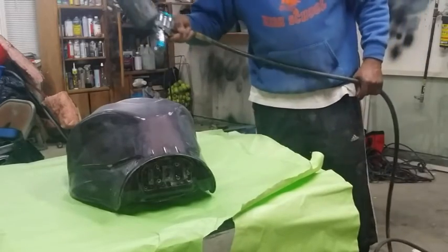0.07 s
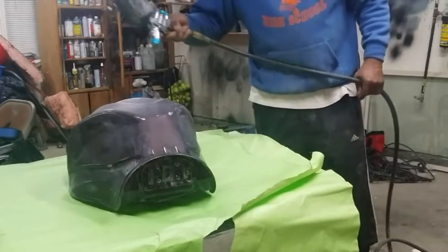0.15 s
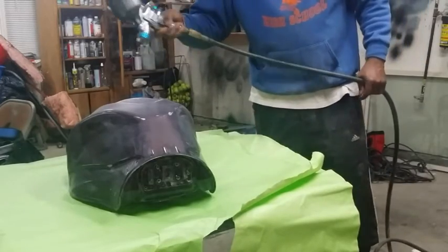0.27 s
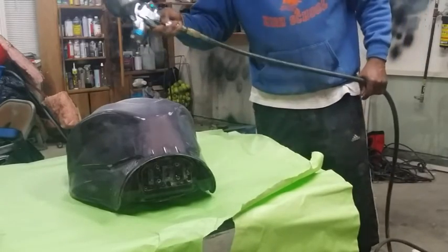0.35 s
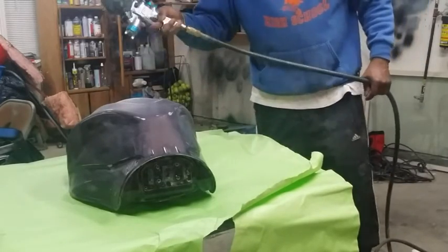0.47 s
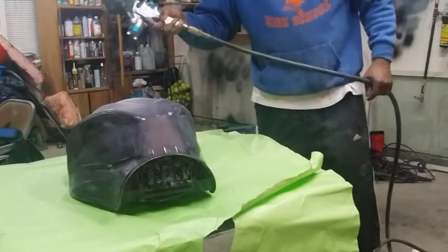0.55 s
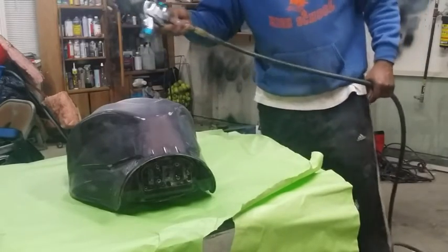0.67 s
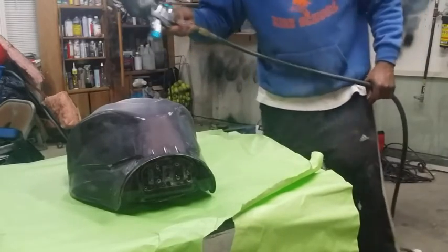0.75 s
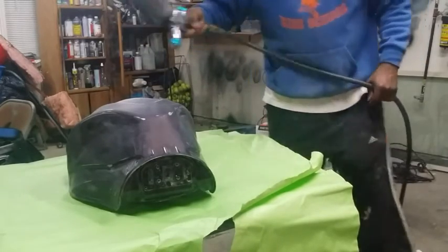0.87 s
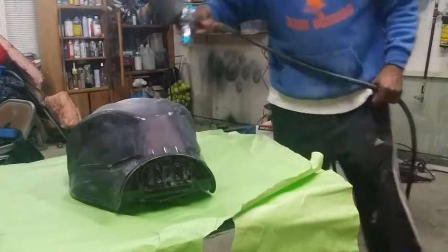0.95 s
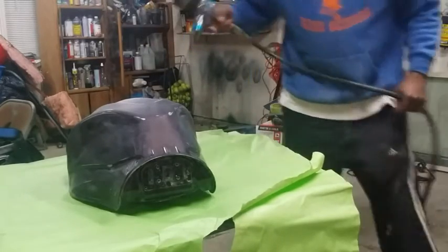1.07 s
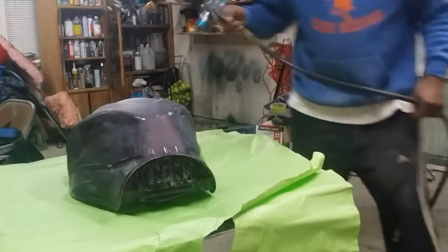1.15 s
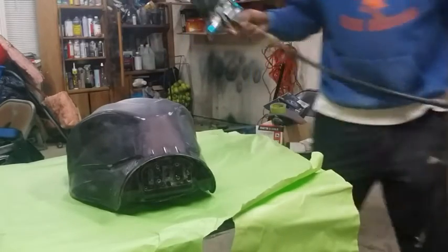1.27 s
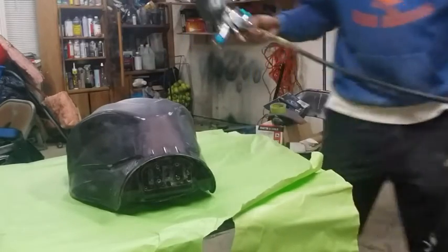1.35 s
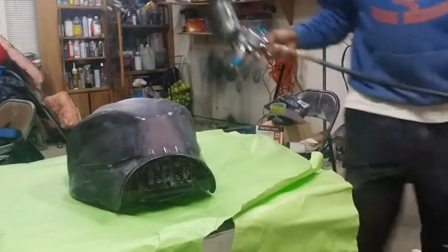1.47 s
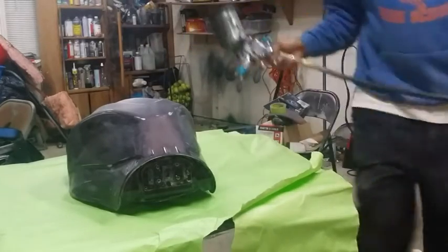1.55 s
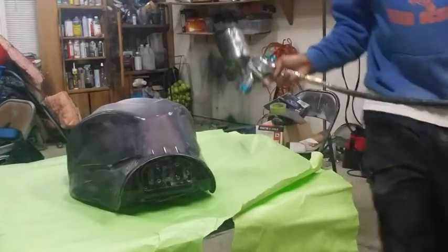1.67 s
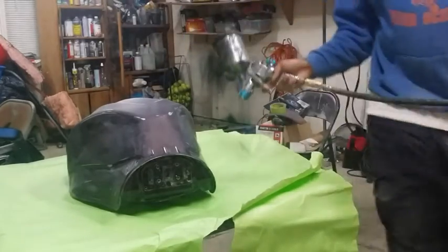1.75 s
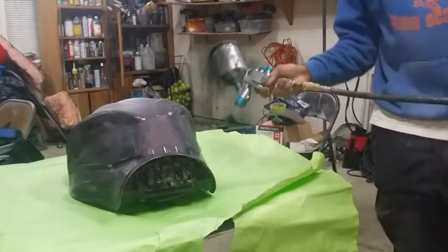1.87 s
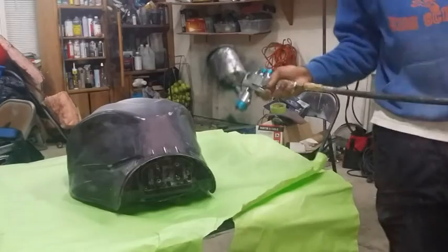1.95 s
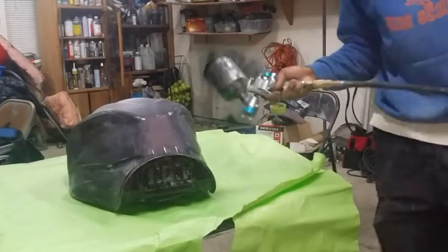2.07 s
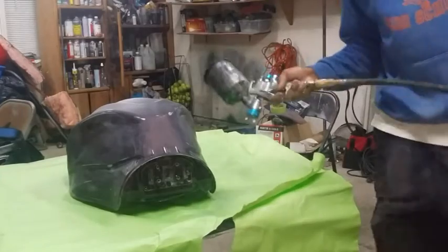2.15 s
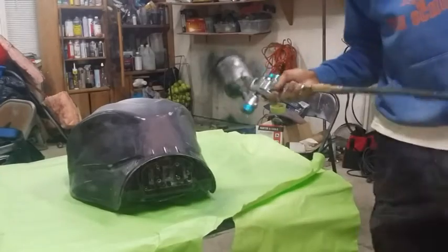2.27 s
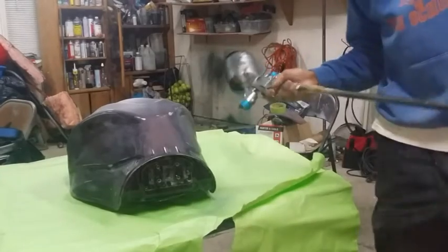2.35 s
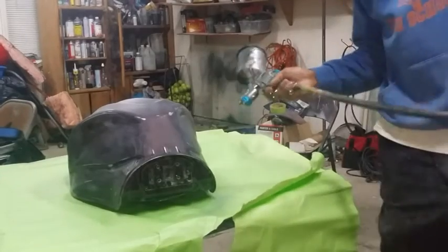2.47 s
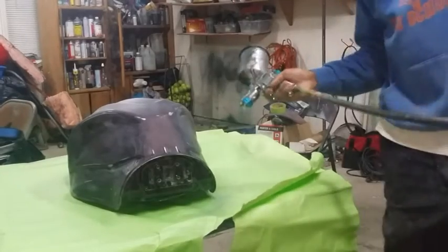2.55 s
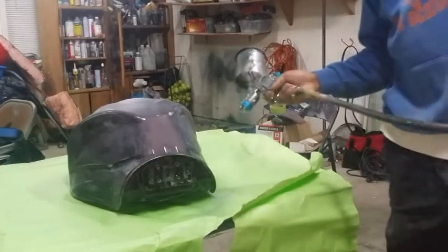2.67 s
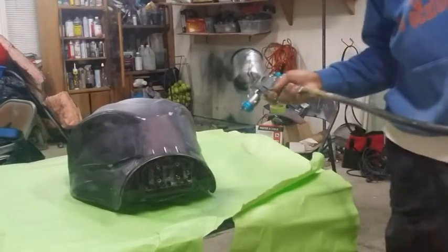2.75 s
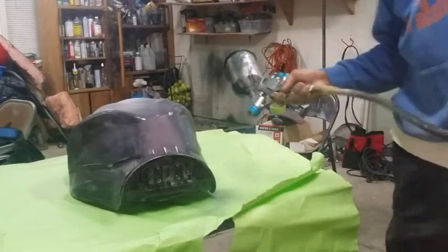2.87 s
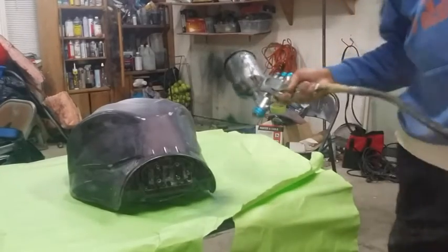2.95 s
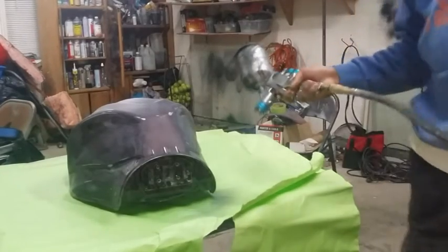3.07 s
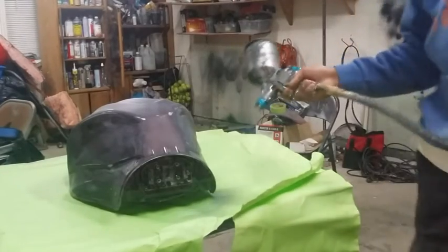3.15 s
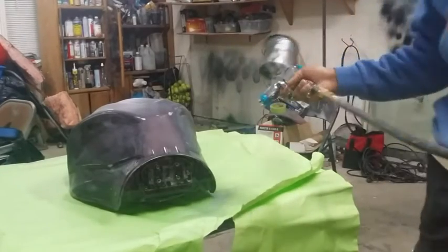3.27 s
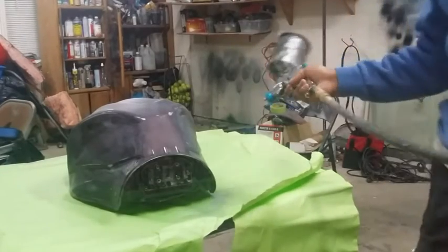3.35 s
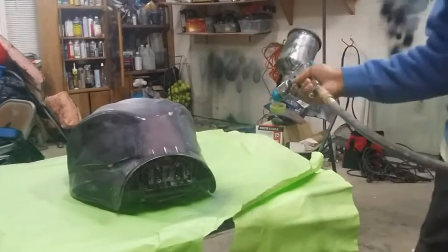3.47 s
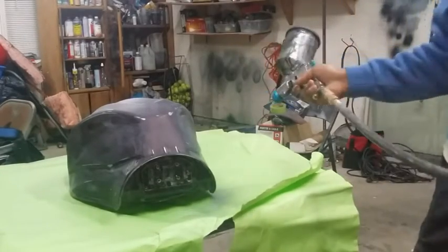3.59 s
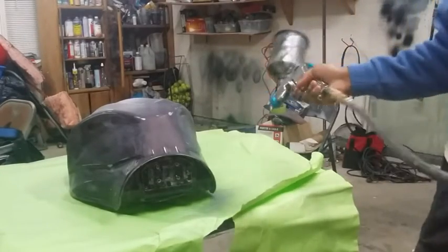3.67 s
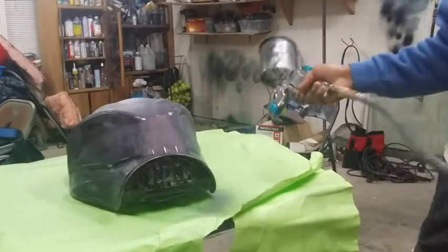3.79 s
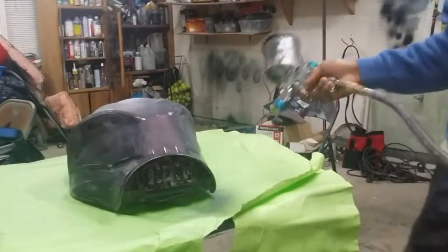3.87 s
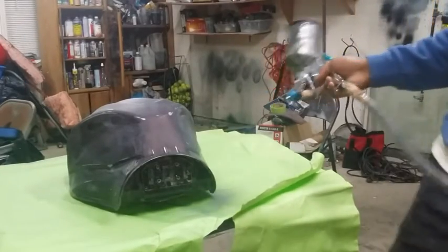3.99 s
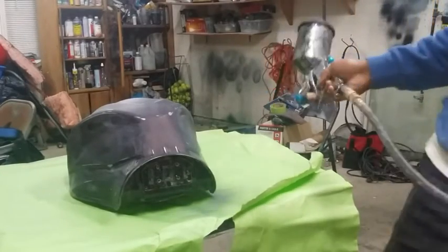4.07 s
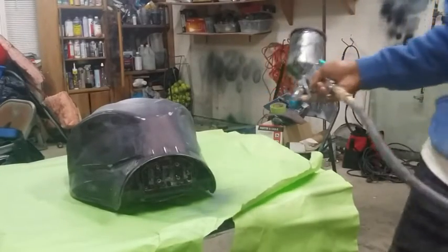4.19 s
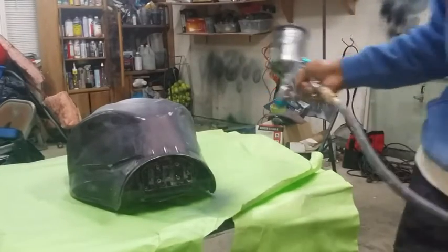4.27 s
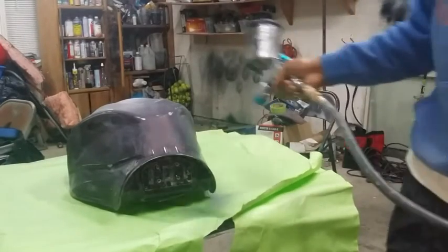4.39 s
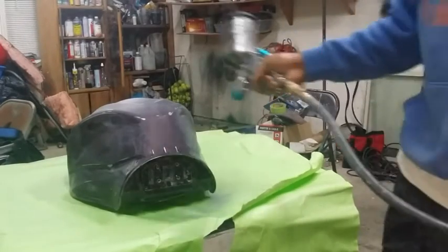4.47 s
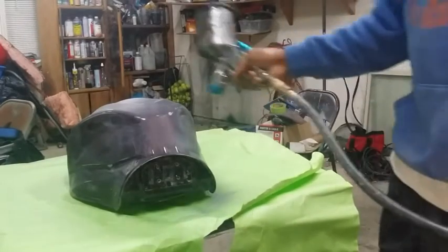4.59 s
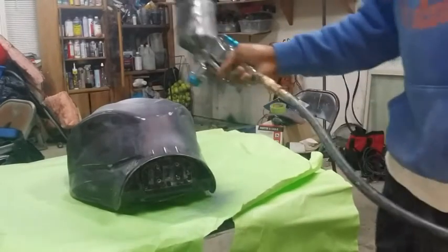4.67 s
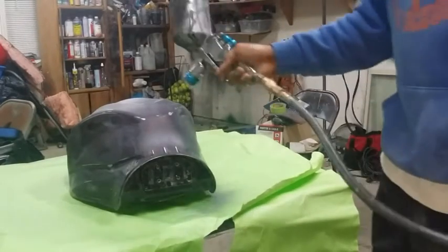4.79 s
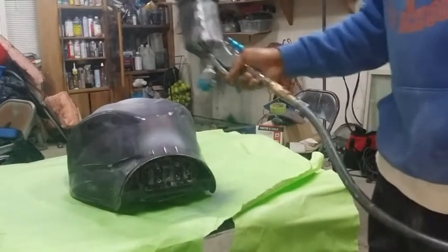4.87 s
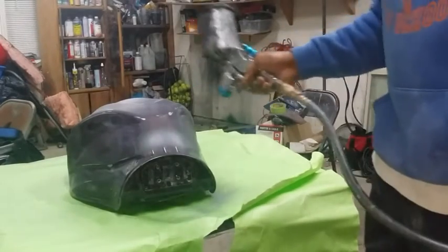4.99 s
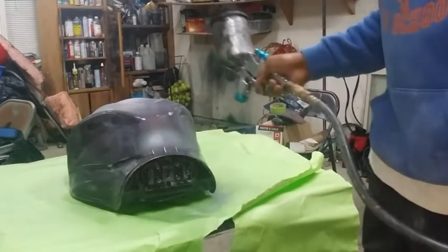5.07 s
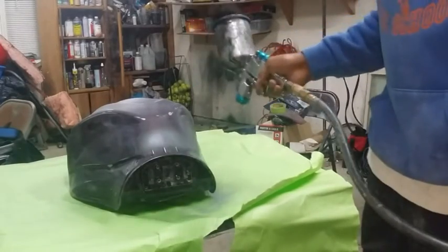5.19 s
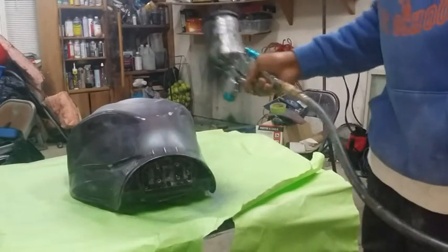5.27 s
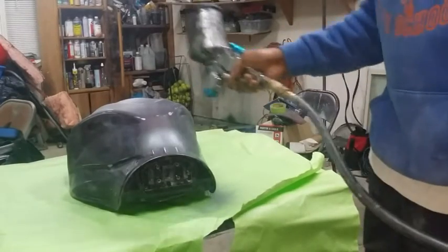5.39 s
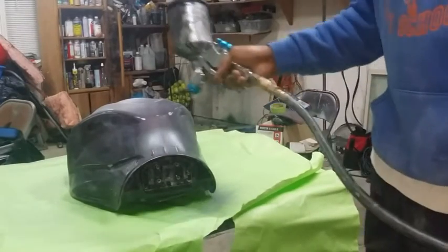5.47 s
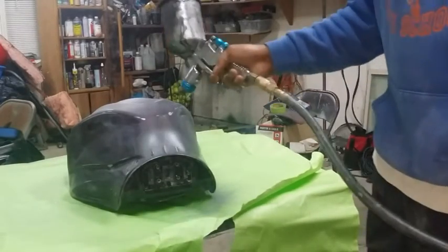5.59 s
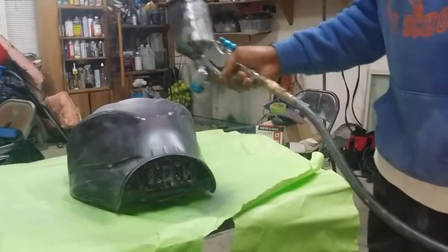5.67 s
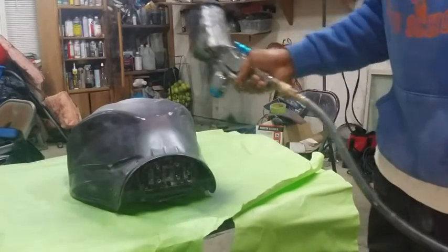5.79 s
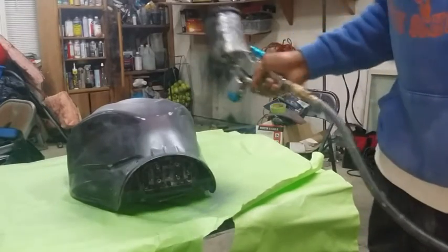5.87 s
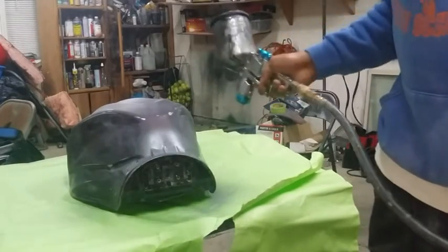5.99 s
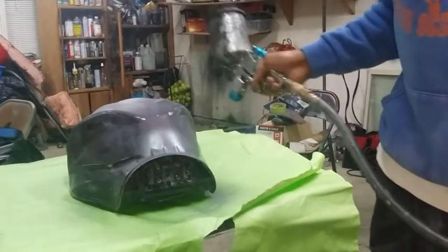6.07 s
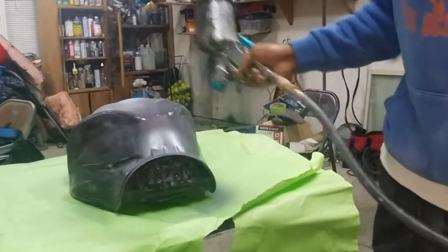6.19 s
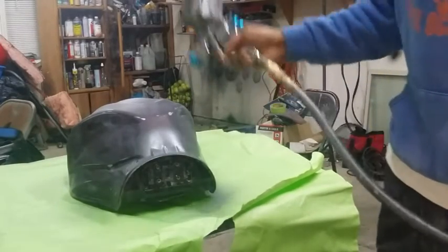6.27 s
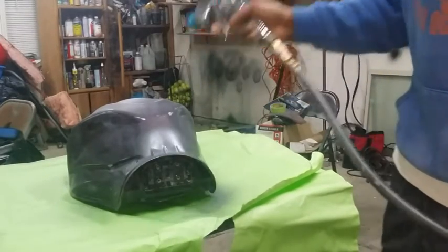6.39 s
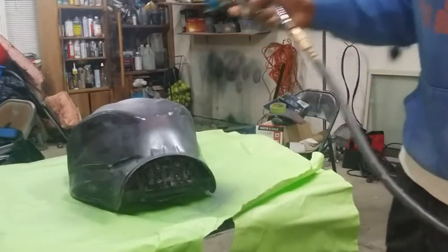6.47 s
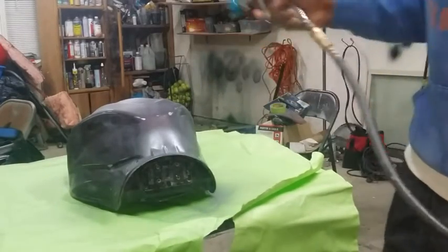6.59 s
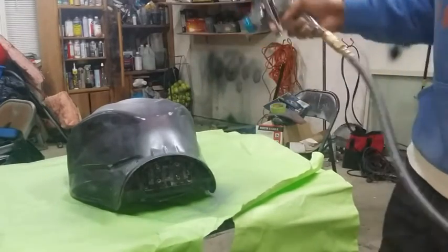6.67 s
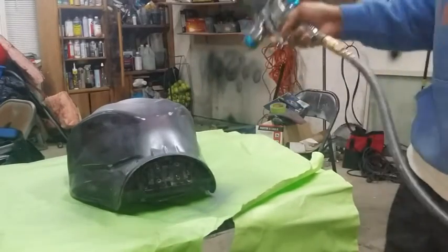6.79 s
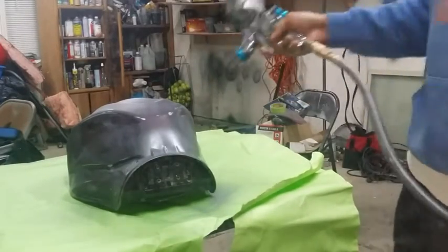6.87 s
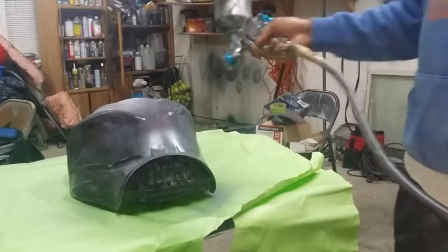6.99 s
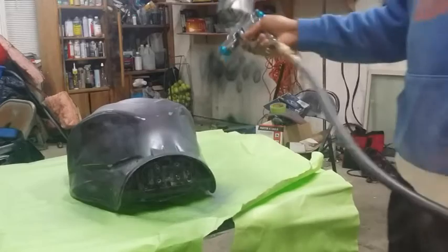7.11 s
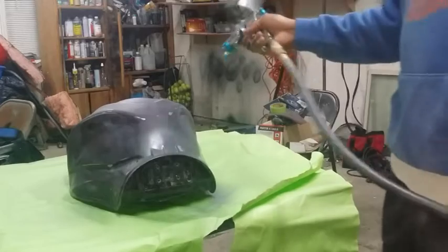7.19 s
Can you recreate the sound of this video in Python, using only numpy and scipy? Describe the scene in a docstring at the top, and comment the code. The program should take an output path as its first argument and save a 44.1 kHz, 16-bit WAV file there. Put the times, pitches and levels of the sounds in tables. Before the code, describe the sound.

In a garage, heard closely in stereo, a paint spray gun is already blowing a strong, bright hiss, which cuts off at about 1.0 s. Dull thuds and low scuffs follow to about 1.8 s, with a thin, slightly whistling air leak underneath. At 1.8 s the gun snaps open with a stronger rush, then holds a steady hiss, swelling a little until 3.9 s. More soft thuds and shuffling fill the gap; a very brief spurt comes at 4.3 s. At 4.4 s a compressor starts with a loud jolt, metallic snaps and rattle, a short rising belt squeal and low motor groan. By 4.7 s it locks into fast mechanical knocking, about seventeen crank turns a second, two main knocks each, with ticking valves, rough drone and pulsing intake hiss. It continues to the end, around 7.2 s, over a gentle, duller spray.

```python
"""Spray gun and compressor in a garage

A paint spray gun hisses in two pulls, a brief spurt and a long gentle pass: jet noise shaped by trigger curves.
A fitting leaks as noise with fuzzy whistles; between pulls the painter shuffles in scuffs and modal thuds.
Then a piston compressor jolts, runs up and knocks: a crank phase times impulses into resonators,
crank orders and pulsed intake noise. Two close microphone ports, left and right, pick it all up.
"""
import sys
import numpy as np
from scipy import signal
from scipy.fft import rfft, irfft
from scipy.io import wavfile
from scipy.ndimage import uniform_filter1d, minimum_filter1d

SR = 44100
rng = np.random.default_rng(int(sys.argv[2]) if len(sys.argv) > 2 else 0)


def transcribe(signal):
    """Save signal, clipped to [-1, 1], as a 16-bit WAV file at the path in sys.argv[1]."""
    frames = np.atleast_2d(signal).T
    limited = np.clip(frames, -1, 1)
    pcm = np.round(limited * 32767).astype(np.int16)
    wavfile.write(sys.argv[1], SR, pcm)


N = 319284  # samples

# Blows in one crank turn: [share of a turn, low knock level/dB, valve tick level/dB, body swell level/dB]
BLOWS = [(-.018, 0, -1, 0), (.07, -9, -15, -4), (.47, -3, -3.5, -1), (.565, -6, -12, -2.5)]
LAG = 10  # samples by which the compressor reaches the left port later
MOTOR_S = 4.38  # the motor starts
TURNS_PER_S = 16.7389  # running speed of the crank


def gain_of(db):
    """Logarithmic level law: decibels to amplitude gain."""
    return 10 ** (np.asarray(db) / 20)


def evened(x):
    """Energy normalization: scales to rms 1."""
    return x / np.sqrt(np.mean(x ** 2) + 1e-20)


def smoothed_twice(x, size):
    """Low-pass smoothing by two running means along time."""
    return uniform_filter1d(uniform_filter1d(x, size=size), size=size)


def read(points, hz):
    """Interpolation of a spectrum table on a logarithmic frequency axis."""
    f, value = np.transpose(points)
    return np.interp(np.log(hz + 1), np.log(f + 1), value)


def follow(rows, outside=-140.):
    """Linear interpolation in time: each column of a curve at every sample."""
    s, *columns = np.transpose(rows)
    return [np.interp(np.arange(N) / SR, s, c, outside, outside) for c in columns]


def hiss(tone, balance, same, lag=0, patchy_db=1.5, size=512):
    """Partially coherent noise at two ports: coloured random spectra with slowly drifting patches."""
    hz = np.fft.rfftfreq(size, 1 / SR)
    a, b, c, d, patches = rng.standard_normal((N // (size // 4) + 5, len(hz), 5)).T
    patches = uniform_filter1d(patches, size=6, axis=0)  # over frequency
    patches = evened(uniform_filter1d(patches, size=16, axis=1))  # over time
    like = np.clip(read(same, hz), -1, 1)[:, None]
    left = a + 1j * b
    lead = np.exp(2j * np.pi * hz * lag / SR)[:, None]
    right = like * left * lead + np.sqrt(1 - like ** 2) * (c + 1j * d)
    half = read(balance, hz)[:, None] / 2
    spread = np.array([gain_of(half), gain_of(-half)])
    z = np.array([left, right]) * spread / np.sqrt((spread ** 2).mean(0))
    z *= gain_of(read(tone, hz)[:, None] + patchy_db * patches)
    return evened(signal.istft(z, nperseg=size, noverlap=3 * size // 4)[1][:, :N])


def ring(modes, rise_s=0.00048):
    """Modal impulse response: damped sines of (f/Hz, width/Hz, level/dB), 3000 samples long."""
    t = np.arange(3000) / SR
    rings = sum(gain_of(db) * np.exp(-np.pi * width * t) * np.sin(2 * np.pi * hz * t) for hz, width, db in modes)
    return rings * np.sin(np.pi / 2 * np.minimum(t / rise_s, 1)) ** 2


def garage(x, wet_db):
    """Room reverberation: direct sound, right port first, with sparse reflections decaying band by band."""
    # Reverberation time: [f/Hz, t60/s]; the tail is cut at 0.5 s
    decay_times = [(200, 0.42), (1000, 1), (4000, 0.33), (12000, 0.28)]
    taps = np.zeros((2, SR // 2))
    at = np.arange(200, SR // 2 - 20, 20) + rng.integers(0, 20, (2, (SR // 2 - 201) // 20))
    np.put_along_axis(taps, at, rng.choice([-1., 1.], at.shape), 1)
    taps[1] = 0.43 * taps[0] + 0.39 * taps[1]  # close ports share much of the tail
    hz, t, z = signal.stft(taps, SR, nperseg=256)
    tail = signal.istft(z * gain_of(-60 * t / read(decay_times, hz)[:, None]), SR, nperseg=256)[1]
    tail *= gain_of(wet_db) / np.linalg.norm(tail[0])
    tail[0, LAG] += 1
    tail[1, 0] += 1
    return signal.fftconvolve(x[None], tail, axes=1)[:, :N]


def leak():
    """Turbulence and edge tones: a hose fitting hisses thinly, with noise-driven resonances as whistles."""
    # Relative spectrum of the air: [f/Hz, level/dB]
    leak_tone = [(530, -45), (900, -19), (1150, -27), (1410, -34), (2230, -24), (3300, -34), (4300, -15),
                 (5580, -9), (6430, -16), (8330, -12), (9040, -7), (10100, -19), (14000, -24), (15000, -39)]
    # Port balance: [f/Hz, left minus right level/dB]
    leak_balance = [(60, 12), (110, 11), (200, 17), (380, 18), (700, 9), (1290, -5), (2380, -10),
                    (4400, -10), (8120, -28), (15000, -81)]
    # Edge tones: [f/Hz, width/Hz, relative level/dB]
    edge_tones = [(2280, 120, -7), (4840, 74, -3), (5420, 80, -2), (6080, 47, 0), (6750, 110, -5),
                  (7670, 180, -4), (8050, 89, -4), (8700, 79, 0), (9290, 44, -1), (9570, 79, -1)]
    air = hiss(leak_tone, leak_balance, [(1000, 0.28), (9000, 0.079)], patchy_db=2.0)
    whistles = signal.oaconvolve(rng.standard_normal((2, N)), ring(edge_tones)[None])[:, :N]
    running = np.arange(N) > MOTOR_S * SR
    level_db = -40 - 8 * running  # fainter once the motor runs
    return gain_of(level_db) * (air + evened(whistles))


def painter():
    """Friction noise: feet, hose and cloth scuff lumpily; each scuff swells, fades and stops."""
    # Scuffs: [t/s, level/dB, fade/(dB/s), length/s, scrape over that level/dB]
    scuffs = [(1.024, -43, 50, .3, -20), (1.166, -43, 60, .65, -22), (1.4, -62, 3, .4, -10),
              (1.575, -57, 200, .1, -10), (1.725, -50, 80, .045, 6), (1.8, -52, 100, .015, -5),
              (3.945, -44, 40, .35, -20), (4.235, -49, 60, .055, 5)]
    # Relative spectrum of the low shuffle: [f/Hz, level/dB]
    shuffle_tone = [(15, -46), (25, -28), (182, 2.5), (378, 4.5), (687, -4.5), (900, -16), (1500, -22),
                    (3250, -58), (5500, -120)]
    # Relative spectrum of the dragging hose: [f/Hz, level/dB]
    scrape_tone = [(500, -30), (900, -6), (1400, -2), (2500, -4), (3800, -5), (5500, -8), (7000, -40)]
    rise_s, end_s = .02, .025
    t, level, drag = np.arange(N) / SR, 0, 0
    for s, db, fade, length, scrape_db in scuffs:
        edges = np.clip(1 + (t - s) / rise_s, 0, 1) * np.clip(1 + (s + length - t) / end_s, 0, 1)
        scuff = edges ** 2 * gain_of(db - fade * np.maximum(t - s, 0))
        level = level + scuff
        drag = drag + scuff * gain_of(scrape_db)
    lumps_db = 1.45 * evened(uniform_filter1d(rng.standard_normal(N), size=250))
    lumps = evened(gain_of(lumps_db))
    even, same = [(100, 0), (2000, 0)], [(200, 0.82), (1200, 0.27)]
    return lumps * (level * hiss(shuffle_tone, even, same, size=1024) + drag * hiss(scrape_tone, even, same))


def thuds():
    """Single-mode impact: dull blows as the trigger drops and feet land, each on one low resonance."""
    # Blows: [t/s, level/dB, f/Hz, width/Hz]
    dull_blows = [(1.024, -30, 290, 35), (1.08, -36, 310, 30), (1.166, -23, 450, 220),
                  (1.177, -30, 330, 90), (1.193, -31, 380, 70), (3.944, -27, 320, 60),
                  (3.946, -27, 230, 50), (3.968, -31, 300, 45), (4.005, -31, 290, 30),
                  (4.228, -34, 220, 80)]
    out = np.zeros(N + 3000)
    for s, db, hz, width in dull_blows:
        out[round(s * SR):][:3000] += ring([(hz, width, db)], rise_s=.003)
    return garage(out[:N], wet_db=-4)


def whine(rows, size):
    """Narrow-band noise: slow random quadrature components carried on a gliding pitch."""
    level_db, hz = follow(rows)
    fuzz = evened(smoothed_twice(rng.standard_normal((2, 2, N)), size))
    fuzz[:, 1] = .8 * fuzz[:, 0] + .6 * fuzz[:, 1]  # the ports share most of it
    phase = 2 * np.pi * np.cumsum(np.maximum(hz, 0)) / SR
    return gain_of(level_db) * (fuzz[0] * np.cos(phase) + fuzz[1] * np.sin(phase))


def motor_strain():
    """Narrow-band tones of belt, motor and frame: three fuzzy pitches follow the run-up."""
    # The belt slips as the motor pulls up: [t/s, level/dB, f/Hz]
    belt_slip = [(4.40, -44, 1154), (4.43, -27, 1220), (4.5, -26, 1397), (4.56, -26, 1542),
                 (4.6, -44, 1630)]
    # The motor strains: [t/s, level/dB, f/Hz]
    motor_groan = [(4.40, -55, 100), (4.43, -36, 102), (4.49, -33, 106), (4.54, -44, 110), (4.72, -40, 115),
                   (4.9, -60, 120)]
    # The frame keeps shaking: [t/s, level/dB, f/Hz]
    frame_shudder = [(4.5, -45, 332), (4.58, -35, 332), (4.68, -35, 332), (4.85, -39, 334), (5.0, -50, 335)]
    return whine(belt_slip, size=90) + whine(motor_groan, size=1500) + whine(frame_shudder, size=500)


def start():
    """Impulse excitation: the motor's jolt rings the frame, which then rattles in quick uneven taps."""
    # Frame modes: [f/Hz, relative level/dB, t60/s]
    frame_modes = [(330, 11, 0.19), (574, -30, 0.3), (966, -7, 0.2), (1110, -22, 0.3), (1290, -10, 0.13),
                   (1350, -22, 0.11), (1857, -16, 0.12), (2250, -12, 0.1), (2471, -12, 0.1),
                   (3042, -9, 0.08)]
    # Relative spectrum of the rattle: [f/Hz, level/dB]
    rattle_tone = [(35, -66), (60, -42), (104, -19), (195, -18), (330, -9), (450, -12), (583, -7),
                   (720, -12), (971, -4), (1300, -9), (2170, -17), (2590, -10), (3150, -12), (3900, -23),
                   (5500, -27), (7000, -19), (9500, -19), (14300, -26)]
    kick = np.zeros(N)
    kick[round(4.382 * SR)] = gain_of(-16)
    low, *high = [(hz, 2.2 / t60, db) for hz, db, t60 in frame_modes]  # width from decay time
    frame = ring([low], rise_s=.022) + ring(high)  # the lowest mode builds up slowly

    taps_db = 2.4 * evened(uniform_filter1d(rng.standard_normal(N), size=90))
    shake = evened(gain_of(taps_db)) * hiss(rattle_tone, [(300, -1), (5000, -1.3)], [(300, 0.83), (3000, 0.098)])
    rattle_s, rise_s, rattle_db, fade = 4.374, .009, -13.5, 38  # s, s, dB, dB per s
    settle_s, settle_fade = 4.57, 110  # from here this many dB per s more
    since = np.maximum(np.arange(N) / SR - rattle_s, 0)
    fade_db = fade * since + settle_fade * np.maximum(since + rattle_s - settle_s, 0)
    level = np.minimum(since / rise_s, 1) ** 2 * gain_of(rattle_db - fade_db)
    return garage(signal.oaconvolve(kick, frame)[:N], wet_db=0.5) + level * shake


def snaps():
    """Impulse excitation of small bodies: switch and valve parts snap in the run-up."""
    # Snaps: [t/s, level/dB]
    snap_times = [(4.382, -7), (4.486, -6), (4.588, -8), (4.609, -14), (4.632, -13)]
    # Modes of the parts: [f/Hz, width/Hz, relative level/dB]
    snap_modes = [(3150, 250, -4), (6900, 260, 0), (9500, 350, -2), (13200, 700, -6)]
    hits = np.zeros(N)
    for s, db in snap_times:
        hits[round(s * SR)] = gain_of(db)
    return garage(signal.oaconvolve(hits, ring(snap_modes))[:N], wet_db=-6)


def crank():
    """Rotational inertia: the crank phase in turns lags behind the motor, then locks to running speed."""
    lost_s = .1951  # time lost to the run-up
    catch_turns, catch_s, catch_shape, rest_turns = 2.1424, .2074, 1.543, -.8
    wander_turns = .0022  # the belt lets the crank wander
    since = np.maximum(np.arange(N) / SR - MOTOR_S, 0)
    turns = TURNS_PER_S * (since - lost_s) + catch_turns * np.exp(-(since / catch_s) ** catch_shape)
    wander = evened(smoothed_twice(rng.standard_normal(N), 1500))
    return np.maximum.accumulate(np.maximum(turns + wander_turns * wander, rest_turns))  # never turns back


def order_levels():
    """Fourier series of a rotating machine: multiples of the crank speed and their relative dB."""
    # Envelope of the crank orders: [f/Hz, level/dB]
    order_tone = [(17, -40), (60, -28), (130, -16), (330, -13), (480, -11), (560, -16), (720, -12),
                  (850, -11), (1100, -7), (1310, -13)]
    # Orders that the frame favours or swallows: [multiple of crank speed, level/dB]
    proud_orders = [(8, -10), (10, -9), (14, -10), (20, -11), (23, -9), (26, -9), (30, -9), (33, -24),
                    (36, -6), (44, -1), (46, -2), (48, -3), (49, -18), (52, -4), (55, -1), (63, -4),
                    (66, -1), (70, -3)]
    k = np.arange(1, 78 + 1)
    odd_db = -6 * (k % 2) * (k < 32)  # two knocks a turn weaken the low odd orders
    db = read(order_tone, k * TURNS_PER_S) + odd_db
    for multiple, proud_db in proud_orders:
        db[multiple - 1] = proud_db
    return k, db


def drifting(x, drift_db):
    """Slow modulation in narrow bands: groups of orders wax and wane at constant overall energy."""
    z = signal.stft(x, nperseg=1024)[2]
    patches = uniform_filter1d(rng.standard_normal(z.shape[1:]), size=2, axis=0)
    patches = evened(uniform_filter1d(patches, size=14, axis=1))
    varied = signal.istft(z * gain_of(drift_db * patches), nperseg=1024)[1][:, :N]
    return evened(varied) * np.std(x)


def drone(turns, load):
    """Periodic excitation: each half turn replays a burst whose spectrum is the crank orders."""
    # Evenness of order groups: [highest multiple, level between knocks as a gain]
    burst_floors = [(18, 1.2), (36, .6), (78, .4)]
    turn_len = 2636  # samples in one turn at running speed
    swell_turns, ring_turns, ring_share = .03, .12, .3  # a blow swells the body, some ringing stays
    (k, db), share = order_levels(), np.arange(turn_len) / turn_len
    # The stored turn starts just before a knock
    since = np.array([(share - .075 - at + .5) % 1 - .5 for at, *_ in BLOWS])
    swells = np.exp(-(since / np.where(since < 0, swell_turns / 2, swell_turns)) ** 2)
    swells += ring_share * (since > 0) * np.exp(-abs(since) / ring_turns)
    burst = gain_of([swell_db for *_, swell_db in BLOWS]) @ swells

    orders, below = np.zeros(turn_len // 2 + 1, complex), 0
    for up_to, floor in burst_floors:
        group, wave = np.zeros_like(orders), rng.standard_normal(turn_len)
        pick = (k > below) & (k <= up_to)
        for _ in range(6):  # phases of noise under the bursts, sizes of the orders
            phase = np.angle(rfft(wave * (floor + burst))[k[pick]])
            group[k[pick]] = gain_of(db[pick]) * np.exp(1j * phase)
            wave = irfft(group, turn_len)
            wave /= np.sqrt(uniform_filter1d(wave ** 2, size=turn_len // up_to * 4, mode="wrap"))
        orders, below = orders + group, up_to

    high = np.minimum(np.arange(len(orders)) / 45, 1)
    apart = np.exp(.55j * high * rng.standard_normal(len(orders)))  # the ports drift apart in phase with pitch
    left, right = orders * apart * gain_of(2.5 * high), orders * gain_of(7.0 * high)  # the right faces the pump
    ports = irfft([left, right], turn_len)
    ports = evened(np.array([np.roll(ports[0], LAG), ports[1]]))

    length = turn_len // 2 + 132  # half turns overlap in crossfades
    fade, out = signal.windows.tukey(length, 264 / length), np.zeros((2, N))
    for half in (0, .5):
        at = np.flatnonzero(np.diff(np.floor(turns + .075 - half)) > 0)
        strokes = np.zeros(N)
        strokes[at] = load[at] * gain_of(.9 * rng.standard_normal(len(at)))
        stroke_wave = np.roll(ports, -round(half * turn_len), 1)[:, :length] * fade
        out += signal.oaconvolve(strokes[None], stroke_wave, axes=1)[:, :N]
    return drifting(out, 1.5)


def compressor():
    """Crank-timed impacts and pulsating flow: knocks, valve ticks and air sucked in after the second knock."""
    # Load curve: [t/s, relative load level/dB, relative intake hiss over the load/dB]
    pump_load = [(4.45, -33, 10), (4.62, -24.5, 5), (4.7, -19, 2), (4.85, -22.5, 1), (7.25, -22.5, 0)]
    # Casing modes: [f/Hz, width/Hz, relative level/dB]
    casing_modes = [(830, 200, -10), (1120, 220, -9), (1500, 260, 0), (1740, 230, 2.5), (1930, 230, 1.5),
                    (2530, 120, -9), (3400, 400, 3)]
    # Valve modes: [f/Hz, width/Hz, relative level/dB]
    valve_modes = [(9670, 330, 4), (12900, 740, -5), (13500, 570, 1), (14300, 500, -1)]
    # Relative spectrum of the intake: [f/Hz, level/dB]
    intake_tone = [(4410, -40), (7000, -4), (7740, -12), (8750, -8), (9450, 6), (10000, 3), (10900, 3),
                   (11600, -11), (12500, 3), (13300, -3), (14100, -2), (14700, 4), (15000, 1)]
    # Relative spectrum of tank, belt and frame: [f/Hz, level/dB]
    rumble_tone = [(25, -14), (60, -24), (120, -18), (250, -18), (400, -13), (560, -19), (760, -7),
                   (1100, 0), (1350, -6), (1900, -7), (2500, -14), (3400, -12.5), (4500, -20), (5600, -30),
                   (7000, -50)]
    # Port balance of the rumble: [f/Hz, left minus right level/dB]
    rumble_balance = [(100, 3), (500, 2.5), (1000, -3.5), (2000, -8.5), (3500, 4.5), (5500, 8)]
    # Likeness of the ports in the rumble: [f/Hz, coherence]
    rumble_likeness = [(60, .6), (250, .7), (500, .55), (1000, .6), (1500, .3), (4000, .15)]
    turns = crank()
    load_db, intake_db = follow(pump_load)
    load = gain_of(load_db)

    knocks, ticks = np.zeros(N), np.zeros(N)
    for share, knock_db, tick_db, _ in BLOWS:
        at = np.flatnonzero(np.diff(np.floor(turns - share)) > 0)
        uneven = rng.standard_normal((len(at), 2))
        knocks[at] += gain_of(knock_db + 1.7 * uneven[:, 0]) * load[at]
        ticks[at] += gain_of(tick_db + 1.5 * uneven[:, 1]) * load[at]
    no_bass = signal.butter(3, 700, "high", fs=SR, output="sos")  # a small casing sends out no bass
    clack = signal.sosfilt(no_bass, ring(casing_modes, rise_s=.0007))
    casing = gain_of([[5], [6]]) * garage(signal.oaconvolve(knocks, clack)[:N], wet_db=-9)
    valves = garage(signal.oaconvolve(ticks, ring(valve_modes))[:N], wet_db=-4)
    valves = gain_of(13.6) * valves * gain_of([[-18], [0]])  # mostly at the right port

    since = (turns - .47) % 1  # turns since the second knock
    suction = gain_of(-16.) + .85 * np.exp(-(since / 0.37) ** 4)  # flow dies away as the cylinder fills
    suction += .38 * np.exp(-((since - .7) / .17) ** 2)  # a weaker second swell
    gulp = gain_of(1.3 * rng.standard_normal(60))[np.floor(turns - .47).astype(int)]  # each turn differs
    air = hiss(intake_tone, [(8000, 0), (10000, -22)], [(8000, 0.089), (14000, 0.09)], patchy_db=2.2)
    intake = load * gain_of(intake_db + 2.3) * suction * gulp * air

    throb = .55 + np.exp(-((2 * turns + .07) % 1) / .3)  # louder just after each knock
    rumble = throb * hiss(rumble_tone, rumble_balance, rumble_likeness, lag=LAG, size=1024)
    body = gain_of(.5) * drone(turns, load) + gain_of(-5.5) * load * rumble
    return casing + valves + intake + body


def gun():
    """Turbulent jet noise: the low part starts thin at each opening, then fills in; the long pass is duller."""
    # Relative spectrum of the jet: [f/Hz, level/dB]
    jet_tone = [(500, -50), (823, -32), (1050, -23), (1450, -18), (2200, -16), (3460, -11.5), (4740, -12.5),
                (6670, -2), (7680, -3.5), (8610, 1), (10100, -3.5), (13800, -6.5), (15000, -6.5)]
    # Port balance of the jet: [f/Hz, left minus right level/dB]
    jet_balance = [(60, 3.5), (99, -11), (160, 5), (270, -1), (450, 30), (740, 15.5), (1220, -1), (2010, 5),
                   (3330, 0.5), (5500, 12.5), (9080, -9), (15000, -5.5)]
    # Likeness of the ports in the jet: [f/Hz, coherence]
    jet_likeness = [(60, -0.11), (380, -0.082), (2380, 0.062), (15000, 0.0062)]
    # Trigger pulls: [open t/s, let go t/s, early level/dB, late level/dB, fade/(dB/s), left minus right level/dB]
    pulls = [(-0.6, 1.03, -16.5, -14.5, 92, -2.5), (1.781, 3.94, -18.5, -13.5, 85, -1.5),
             (4.281, 4.345, -20.5, -18.5, 90, 0)]
    open_s, spurt_db, spurt_s = .008, 6, .15  # the valve snaps open and the hose pressure spurts out
    dull_db, thin_db, thin_s = 1.5, -11, .08  # added below 4 kHz; the first rush is thin
    puff_db, puff_s = 5, .015  # a short full-bodied puff leads it
    linger = .85  # the low part fades at this share of the rate
    seep_db, seep_dull_db = -42, 4  # what seeps with the trigger at rest
    pass_s, pass_db, pass_dull_db, pass_lean_db = 4.38, -29.5, 8, -4.5  # the gentle long pass

    t = np.arange(N) / SR
    jet = hiss(jet_tone, jet_balance, jet_likeness, patchy_db=1.35)
    low = signal.sosfiltfilt(signal.butter(2, 4000, fs=SR, output="sos"), jet)
    side = np.array([[.5], [-.5]])  # left, right
    passing = np.clip((t - pass_s) / .2, 0, 1) * gain_of(pass_db + side * pass_lean_db)
    seep = gain_of(seep_db) * np.ones((2, N))
    bright = passing ** 2 + seep ** 2  # powers of separate flows add
    dull = (passing * gain_of(pass_dull_db)) ** 2 + (seep * gain_of(seep_dull_db)) ** 2
    for opened, shut, early_db, late_db, fade, lean_db in pulls:
        since, released = np.maximum(t - opened, 0), np.maximum(t - shut, 0)
        flow_db = np.interp(t, [opened, shut], [early_db, late_db]) + spurt_db * np.exp(-since / spurt_s)
        flow = np.minimum(since / open_s, 1) ** 2 * gain_of(flow_db - fade * released + side * lean_db)
        bright = bright + flow ** 2
        body_db = dull_db + thin_db * np.exp(-since / thin_s) + (puff_db - thin_db) * np.exp(-since / puff_s)
        linger_db = (1 - linger) * fade * released
        dull = dull + (flow * gain_of(body_db + linger_db)) ** 2
    flutter_db = 0.27 * evened(uniform_filter1d(rng.standard_normal(N), size=500))
    return gain_of(flutter_db) * (np.sqrt(bright) * (jet - low) + np.sqrt(dull) * low)


def scene():
    """Superposition of all sources at the two ports; the hiss of gun and leak is kept above about 950 Hz."""
    high_pass = signal.butter(8, 950, "high", fs=SR, output="sos")
    air = signal.sosfilt(high_pass, leak() + gun())
    return air + painter() + thuds() + motor_strain() + start() + snaps() + compressor()


def record(dry):
    """Linear filtering and gain control: bass and top treble roll off, a limiter holds peaks, then a band limit."""
    port_hz, edge_hz = 14520, 15881
    peak, grab_s = .95, .003  # the limiter's ceiling and its speed
    heard = signal.sosfilt(signal.butter(2, 70, "high", fs=SR, output="sos"), dry)
    heard = signal.oaconvolve(heard, signal.firwin(801, port_hz, window=("kaiser", 5), fs=SR)[None], "same")
    span = round(grab_s * SR)
    room = minimum_filter1d(peak / np.maximum(abs(heard), peak), size=2 * span + 1)
    heard = heard * smoothed_twice(room, span)
    return signal.oaconvolve(heard, signal.firwin(511, edge_hz, window=("kaiser", 9), fs=SR)[None], "same")


dry = scene()
out = record(dry)
transcribe(out)
```